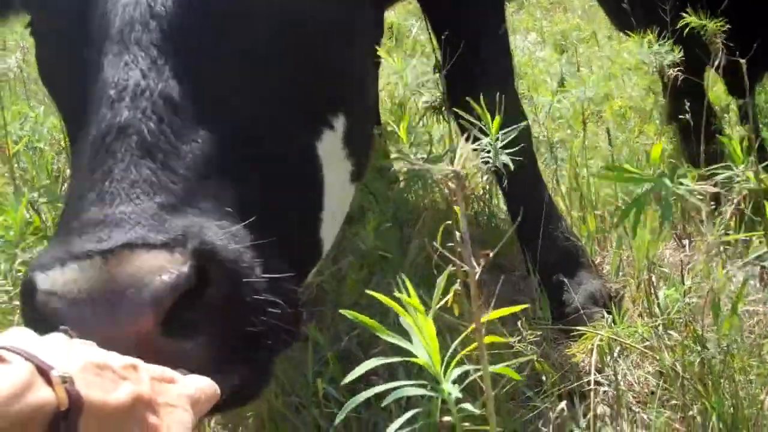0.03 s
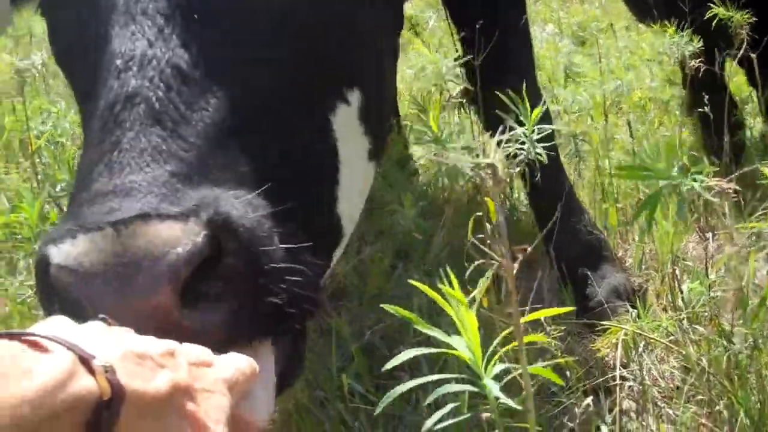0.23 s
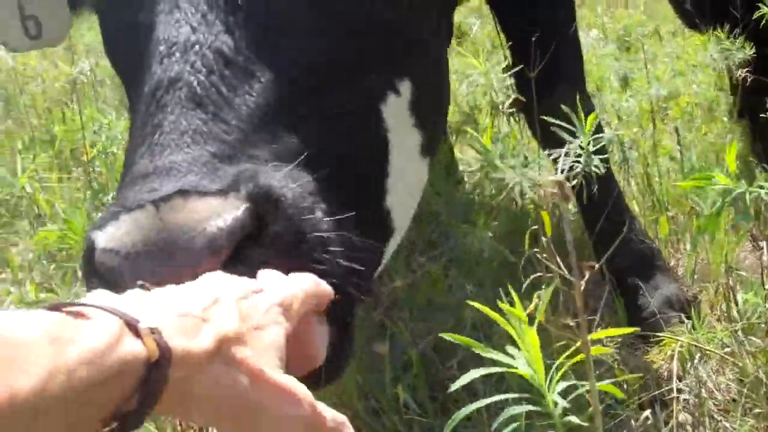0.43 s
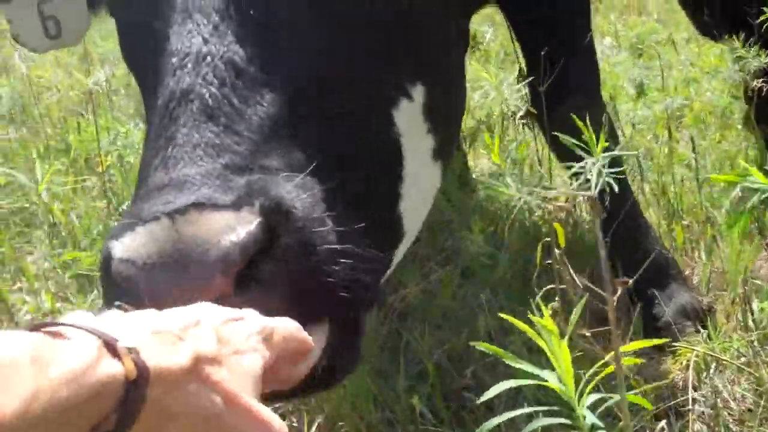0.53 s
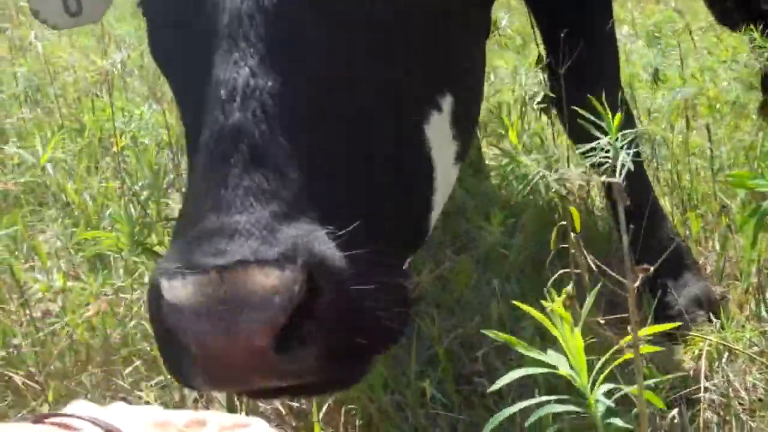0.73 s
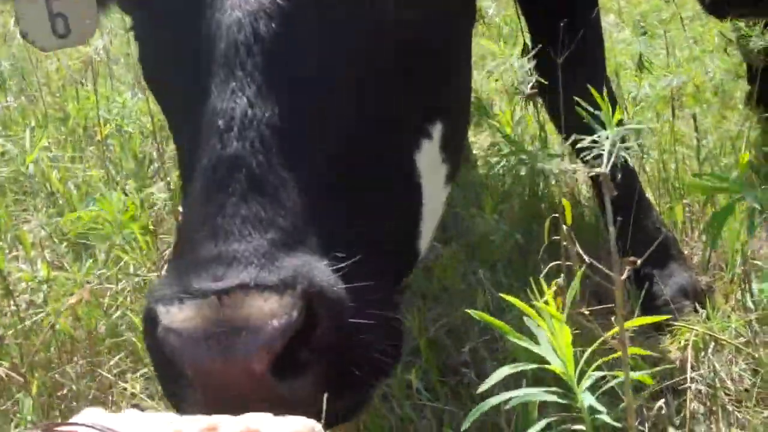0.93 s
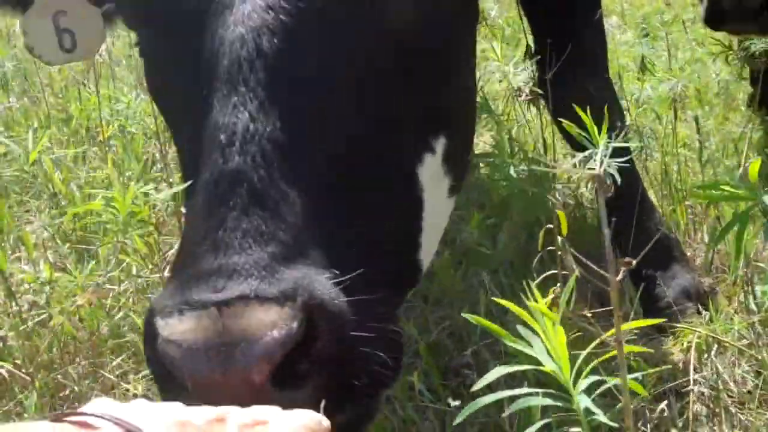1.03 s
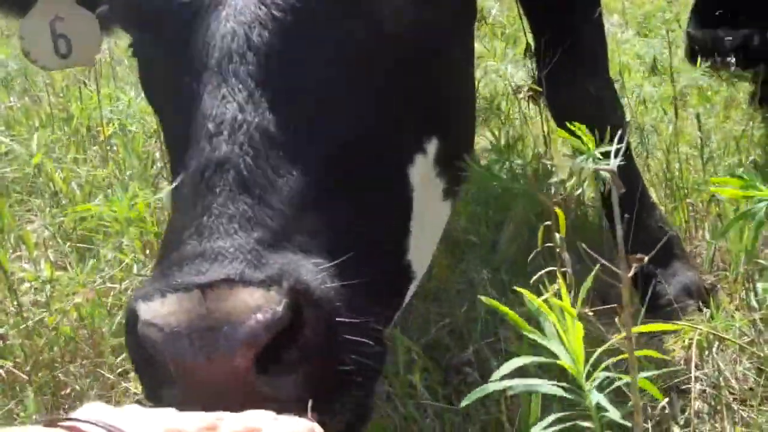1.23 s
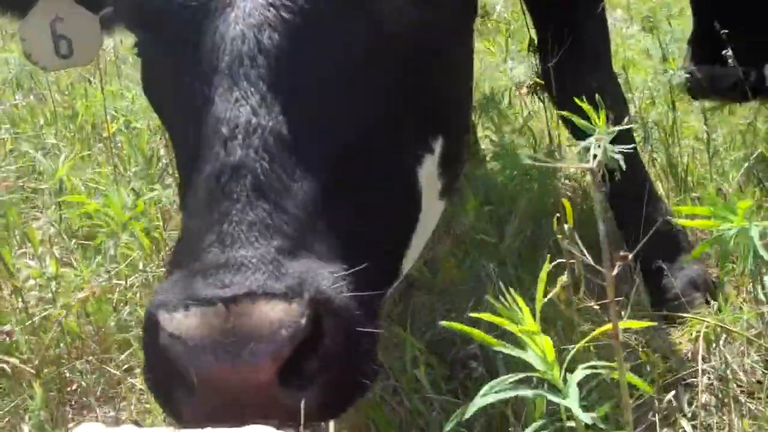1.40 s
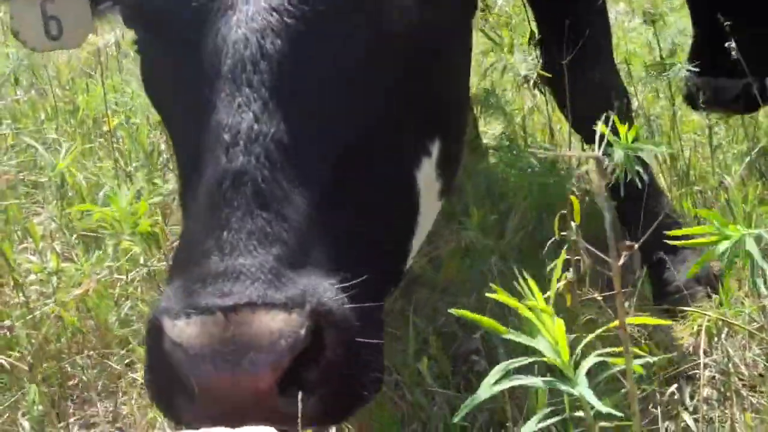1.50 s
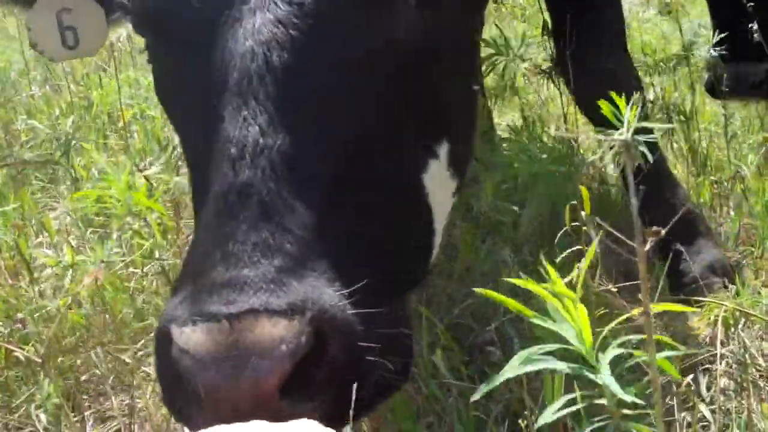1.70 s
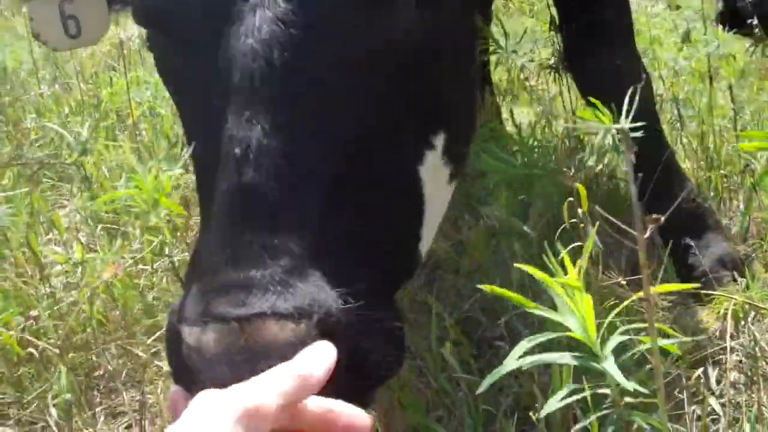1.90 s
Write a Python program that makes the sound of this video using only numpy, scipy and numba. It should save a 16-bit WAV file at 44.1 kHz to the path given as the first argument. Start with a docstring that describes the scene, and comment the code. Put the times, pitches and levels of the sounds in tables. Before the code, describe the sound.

A single cow moos very close in a quiet pasture, beginning as a muffled nasal hum, opening abruptly, rising in pitch and force, then dropping into a short rough ending; faint air hiss and a dry tick follow.

```python
"""A faint open-air hiss is heard first, with a nasal hum that opens abruptly into one close cow's moo.
The call climbs in pitch and force, then sags into a short rough ending; a faint small tick, puffs of air,
wind bumps and a dry tick surround it. The voice is a source-filter sum: harmonics and pulsed breath shaped
by tract resonances. Air, wind, puffs and the small tick are shaped noise; the dry tick sums decaying modes."""
import sys
import numpy as np
from scipy import signal
from scipy.fft import rfft, irfft
from scipy.io import wavfile
from scipy.ndimage import uniform_filter1d, map_coordinates
from numba import njit

SR = 44100
rng = np.random.default_rng(int(sys.argv[2]) if len(sys.argv) > 2 else 0)


def persist_wave(psi):
    """Save psi, clipped to +-1, as 16-bit WAV."""
    counts = np.round(np.clip(psi, -1, 1) * 32767).astype(np.int16)
    wavfile.write(sys.argv[1], SR, np.atleast_2d(counts).T)


N = 85995  # samples

# Relative spectrum of the open air [f/Hz, level/dB]
AIR_SPECTRUM = [(30, -4), (125, -2), (220, -3.5), (450, -7.5), (900, -10.5), (2000, -10.5), (4000, -11),
                (8000, -14), (10000, -15.5), (14000, -30)]
# Likeness of the air at the two ears [f/Hz, correlation]
AIR_CORRELATION = [(40, 1), (150, 1), (600, 0.84), (2500, 0.49), (8000, 0)]
AIR_DB, AIR_SWELL_DB = -45, .5
AIR_PAN_DB, COW_PAN_DB = -3.8, -1.9  # left minus right

# Wind bumps on the microphone [t/s, standard deviation/s, level/dB]
WIND_BUMPS = [(0.382, 0.01, -50), (0.998, .025, -41), (1.516, 0.05, -49), (1.682, 0.023, -37.5),
              (1.86, 0.077, -51.5)]
BUMP_HZ, BUMP_WIDTH_HZ, RUMBLE_DB = 60, 71, -57.5

# First one faint small tick, then puffs of air [t/s, standard deviation/s, hiss level/dB, low rush level/dB]
NOISE_BURSTS = [(0.117, .002, -41.5, -62), (0.349, 0.041, -41.5, -35), (0.596, 0.024, -39, -60),
                (0.905, 0.0067, -42.5, -38), (0.97, 0.029, -43, -43), (1.603, 0.0034, -39, -37),
                (1.661, 0.1, -51.5, -44)]
HISS_HZ, HISS_WIDTH_HZ = 6430, 9200
RUSH_HZ, RUSH_WIDTH_HZ = 377, 1530

# Modes of the dry tick, before its soft onset [f/Hz, decay/s, relative level/dB]
TICK_MODES = [(2280, .0008, -2), (2700, .0008, 0), (4000, .0012, -18), (5300, .0008, -17)]
TICK_S, TICK_ATTACK_S, TICK_PEAK_DB = 1.9284, .003, -21

FIELD_DB, FIELD_DECAY_S = -20, .02  # scatter from grass and ground

# Vibration rate of the vocal folds, before smoothing and jitter [t/s, f/Hz]
FOLD_PITCH = [(0, 105.1), (.102, 109.7), (.17, 114.8), (.238, 121.1), (.36, 125.8), (.48, 130.6),
              (.6, 134.6), (.78, 139.8), (.842, 144.1), (.96, 156.1), (1.054, 164), (1.2, 170.5),
              (1.315, 174.9), (1.38, 175.5), (1.445, 174.5), (1.498, 169.8), (1.526, 164.5), (1.552, 151),
              (1.58, 134), (1.62, 114)]
# Roughness of the folds [t/s, jitter as share of pitch, breath level/dB relative to the harmonics]
FOLD_ROUGHNESS = [(0, .005, -20), (.2, .003, -23), (.5, .0013, -28), (1.2, .001, -28), (1.5, .0012, -27),
                  (1.54, .005, -22), (1.58, .012, -16), (1.63, .02, -12)]
# Centres of the two main resonances [t/s, throat f/Hz, mouth f/Hz]
TRACT_SHAPE = [(0, 370, 1840), (.28, 380, 1947), (.45, 370, 1914), (.72, 379, 1909), (.95, 374, 1950),
               (1.13, 402, 1962), (1.3, 398, 1940), (1.44, 400, 1954), (1.52, 382, 1986), (1.57, 350, 1940),
               (1.61, 378, 1960)]
# Pitch at low, middle and full effort [f/Hz]
EFFORT_PITCH = [126.4, 134.1, 173.4]

# Levels of the harmonics in each part of the tract, before the dips:
# throat and nose sound from the start; mouth and treble join when the mouth opens.
# Low throat resonances [t/s, level/dB]
THROAT_COURSE = [(0.0, -44.5), (0.15, -37.5), (0.176, -31), (0.254, -27), (0.586, -19), (0.796, -20),
                 (0.96, -22), (1.456, -18), (1.542, -23), (1.592, -19), (1.635, -36.5)]
# Nasal ring [t/s, level/dB]
NOSE_COURSE = [(0, -50), (.15, -48), (.2, -45), (.27, -36), (.42, -34), (.52, -38), (.66, -55), (.9, -52),
               (1.25, -48), (1.5, -50), (1.62, -58)]
# Bright middle of the voice [t/s, level/dB]
MOUTH_COURSE = [(0.172, -35), (0.196, -33), (0.268, -28), (0.54, -24.5), (0.588, -27), (0.648, -23.5),
                (0.838, -24.5), (1.09, -15.5), (1.186, -16.5), (1.336, -14), (1.542, -16.5), (1.55, -21),
                (1.61, -28.5), (1.625, -51)]
# Treble of the voice [t/s, level/dB]
TREBLE_COURSE = [(.172, -45), (.25, -41), (.31, -35), (.44, -35), (.52, -33), (.64, -31.5), (.76, -34),
                 (.85, -39), (.96, -36), (1.06, -31), (1.15, -32), (1.25, -26.5), (1.32, -30),
                 (1.44, -32.5), (1.52, -31), (1.56, -38), (1.6, -42), (1.625, -51)]

# Side resonances, relative levels before flutter, centres before drift:
# throat [f/Hz, width/Hz, level/dB at low, middle and full effort]
THROAT_CAVITIES = [(154, 200, -21, -34, -29), (712, 170, -19.5, -52, -16)]
# mouth, also shifted with its main resonance [f/Hz, width/Hz, level/dB at low, middle and full effort]
MOUTH_CAVITIES = [(937, 128, -14, -13, -9.5), (1145, 130, -11, -19, -17), (1462, 107, -4, -8.5, -5.5),
                  (1733, 236, -80, -14, -9.5), (2284, 50, -10, -12, -20.5), (2340, 132, -24, -56.5, -11)]
# treble [f/Hz, width/Hz, level/dB at low, middle and full effort]
TREBLE_CAVITIES = [(2960, 110, -12, -9, 2), (3130, 130, 5, -5, -7), (3450, 200, -7, -3, 1),
                   (3700, 190, -6, 3, -9), (3870, 150, -8, 1, 1), (4320, 120, -15, -18, -11),
                   (4700, 300, -19, -18, -18), (5200, 160, -23, -18, -23), (6150, 220, -23, -25, -20),
                   (6900, 220, -25, -27, -20)]
# Fixed nasal resonances [f/Hz, width/Hz, relative level/dB]
NASAL_MODES = [(2650, 140, 0), (4380, 200, -16)]
# Dips from the side branch of the nose [f/Hz, width/Hz, depth share, capped at 0.95 in use]
NASAL_DIPS = [(1197, 96, 0.83), (2795, 37, 1), (545, 80, 0.53), (3819, 45, 1)]

HUM_HZ, HUM_WIDTH_HZ, HUM_DB = 1193, 156, -45.5  # sounds until the mouth opens
THROAT_WIDTH_HZ, MOUTH_WIDTH_HZ = 99.4, 105
THROAT_SKIRT, SKIRT = 1.87, 2.5  # width of the second, wider resonance, in first widths
FLUTTER_DB, DRIFT = 1.8, .006  # wander of level, and of centre as a share
OPENS_S, OPENING_S, ENDS_S, RELEASE_S = .165, .002, 1.632, .02
BREATH_CORNER_HZ = 2400  # breath gains on the harmonics above this
LAG_S_PER_HZ = 3.5e-7  # extra delay of the treble, per hertz
HOP, BINS, HARMONICS = 128, 2048, 60  # samples between tract frames, transform length, partials
TOP_HZ = 14200


def undb(db):
    """The decibel law: level to amplitude gain."""
    return 10 ** (np.asarray(db) / 20)


def curve(rows, axis=1):
    """Linear interpolation of one table column over time."""
    rows = np.array(rows, float)
    return np.interp(np.arange(N) / SR, rows[:, 0], rows[:, axis])


def unit(x):
    """Normalisation to unit root-mean-square."""
    return x / np.sqrt(np.mean(x ** 2))


def pan(db):
    """Stereo level difference: half the decibels to each side, in opposite senses."""
    return undb(np.array([[db], [-db]]) / 2)


def walk(rate):
    """Smoothed random steps, about `rate` per second, with a spread near 1."""
    step = int(SR / rate)
    steps = np.repeat(rng.standard_normal(N // step + 1), step)
    smooth = uniform_filter1d(uniform_filter1d(steps, step), step)
    return unit(smooth)[:N]


@njit
def svf(x, hz, width):
    """State-variable resonance: two integrators in feedback pass a band about a moving centre."""
    y, band, low = np.empty(len(x)), 0., 0.
    for i in range(len(x)):
        g = np.tan(np.pi * hz[i] / SR)
        damping = width / hz[i]
        v = (band + g * (x[i] - low)) / (1 + g * (g + damping))
        band = 2 * v - band
        low = low + 2 * g * v
        y[i] = damping * v
    return y


def ring(x, hz, width_hz, skirt_hz):
    """Cascaded resonance: a second resonance steepens the flanks of the first."""
    centre = hz * np.ones(N)
    return svf(svf(x, centre, float(width_hz)), centre, float(skirt_hz))


def noise(hz, width_hz):
    """Band-limited noise: resonance selects a band of white noise, set to rms 1."""
    return unit(ring(rng.standard_normal(N), hz, width_hz, width_hz))


def swell(at, spread):
    """Gaussian envelope about one moment."""
    return np.exp(-((np.arange(N) / SR - at) / spread) ** 2 / 2)


def along(log_hz, rows):
    """Interpolation of a spectrum on a logarithmic frequency axis."""
    rows = np.array(rows)
    return np.interp(log_hz, np.log(rows[:, 0]), rows[:, 1])


def air():
    """Partial coherence: shared and opposed noise make a gently swelling hiss, less alike in the treble."""
    log_hz = np.log(np.fft.rfftfreq(N, 1 / SR) + 1)
    alike = np.clip(along(log_hz, AIR_CORRELATION), -1, 1)
    colour = undb(along(log_hz, AIR_SPECTRUM))
    mid = irfft(rfft(rng.standard_normal(N)) * colour * np.sqrt(1 + alike), N)
    side = irfft(rfft(rng.standard_normal(N)) * colour * np.sqrt(1 - alike), N)
    level = undb(AIR_DB + AIR_SWELL_DB * walk(1.5))
    return unit(np.array([mid + side, mid - side])) * level * pan(AIR_PAN_DB)


def wind():
    """Incoherent low-frequency noise: a rumble with soft bumps, independent in each channel."""
    rumble = np.array([noise(BUMP_HZ, BUMP_WIDTH_HZ) for _ in range(2)])
    bumps = sum(undb(db) * swell(at, spread) for at, spread, db in WIND_BUMPS)
    return rumble * (undb(RUMBLE_DB) + bumps)


def small_tick_and_puffs():
    """Gaussian-gated noise: a faint small tick, then puffs of air, as independent hiss over a common rush."""
    hiss = np.array([noise(HISS_HZ, HISS_WIDTH_HZ) for _ in range(2)]) * pan(AIR_PAN_DB)
    rush = noise(RUSH_HZ, RUSH_WIDTH_HZ)
    total = 0
    for at, spread, hiss_db, rush_db in NOISE_BURSTS:
        total = total + swell(at, spread) * (undb(hiss_db) * hiss + undb(rush_db) * rush)
    return total


def dry_tick():
    """Modal decay: damped sinusoids with a soft onset make a dry tick, like a stalk snapping."""
    age = np.maximum(np.arange(N) / SR - TICK_S, 0)
    modes = sum(undb(db) * np.exp(-age / decay) * np.sin(2 * np.pi * hz * age)
                for hz, decay, db in TICK_MODES)
    modes = modes * (1 - np.exp(-age / TICK_ATTACK_S)) ** 2
    return undb(TICK_PEAK_DB) * modes / np.abs(modes).max()


def field(x):
    """Diffuse scattering: a brief, treble-rich tail in opposite phase left and right widens the sound."""
    age = np.arange(SR // 8) / SR
    tail = rng.standard_normal(len(age)) * np.exp(-age / FIELD_DECAY_S)
    bright = svf(x, np.full(N, 4200.), 3330.0)
    scattered = signal.fftconvolve(x * 1.4 + 3.25 * bright, tail / np.linalg.norm(tail))[:N]
    side = undb(FIELD_DB) * scattered
    return np.array([side, -side])


def peak(grid, hz, width_hz, skirt=SKIRT):
    """Resonance law: power response with steepened flanks, moments x frequencies."""
    hz = np.reshape(hz, (-1, 1))
    off = ((grid ** 2 - hz ** 2) / (grid * width_hz)) ** 2
    return 1 / ((1 + off) * (1 + off / skirt ** 2))


def cavities(grid, rows, pitch, shift):
    """Superposed resonances: strengths follow vocal effort, read from pitch; levels and centres wander."""
    total = 0
    for hz, width, *db in rows:
        level = np.interp(pitch, EFFORT_PITCH, db) + FLUTTER_DB * walk(12.09)[::HOP]
        centre = hz * (1 + shift + DRIFT * walk(9)[::HOP])
        total = total + undb(level)[:, None] ** 2 * peak(grid, centre, width)
    return total


def at_harmonics(response, pitch):
    """Harmonic sampling: a moving response read at the first multiples of the pitch."""
    bins = np.outer(pitch, np.arange(1, HARMONICS + 1)) * BINS / SR
    moments = np.arange(len(pitch))[:, None] + 0 * bins
    return map_coordinates(response, [moments, bins], order=1)


def frame_level(rows):
    """Gain at each tract frame, by the decibel law."""
    return undb(curve(rows)[::HOP])


def tract(pitch):
    """Vocal-tract filtering: throat, nose and mouth powers add; the nose's side branch cuts dips."""
    grid = np.fft.rfftfreq(BINS, 1 / SR) + 1
    opened = np.clip((np.arange(N)[::HOP] / SR - OPENS_S) / OPENING_S, 0, 1)
    throat_hz = curve(TRACT_SHAPE)[::HOP]
    mouth_hz = curve(TRACT_SHAPE, axis=2)[::HOP]
    mouth_shift = mouth_hz / np.median(mouth_hz) - 1

    throat = peak(grid, throat_hz, THROAT_WIDTH_HZ, THROAT_SKIRT)
    throat = throat + cavities(grid, THROAT_CAVITIES, pitch, 0)
    mouth = peak(grid, mouth_hz, MOUTH_WIDTH_HZ) + cavities(grid, MOUTH_CAVITIES, pitch, mouth_shift)
    treble = cavities(grid, TREBLE_CAVITIES, pitch, 0)
    nose = sum(undb(db) ** 2 * peak(grid, hz + 0 * pitch, width) for hz, width, db in NASAL_MODES)
    hum = peak(grid, HUM_HZ + 0 * pitch, HUM_WIDTH_HZ)

    parts = [(throat, frame_level(THROAT_COURSE)),
             (mouth, opened * frame_level(MOUTH_COURSE)),
             (treble, opened * frame_level(TREBLE_COURSE)),
             (nose, frame_level(NOSE_COURSE)),
             (hum, (1 - opened) * undb(HUM_DB))]
    total = 0
    for power, rms in parts:
        # the harmonics of each part together carry its rms
        scale = 2 * rms ** 2 / at_harmonics(power, pitch).sum(axis=1)
        total = total + power * scale[:, None]
    gain = np.sqrt(total)
    for hz, width, depth in NASAL_DIPS:
        gain = gain * (1 - np.clip(depth, 0, .95) * peak(grid, hz, width))
    return gain + 1e-6, grid


def fold_harmonics(gain, grid, pitch, phase):
    """Fourier synthesis with minimum phase: fold pulses are harmonics, each resonance ringing after its pulse."""
    n = np.arange(N)
    cepstrum = irfft(np.log(gain))[:, :BINS // 2]
    lag = 2 * rfft(cepstrum, BINS).imag
    lag = lag - np.pi * LAG_S_PER_HZ * grid ** 2  # the treble leaves the tract a little later
    sizes = at_harmonics(gain, pitch).T
    turns = at_harmonics(lag, pitch).T
    voice = 0
    for number, (size, turn) in enumerate(zip(sizes, turns), start=1):
        angle = number * phase + np.interp(n, n[::HOP], turn)
        voice = voice + np.interp(n, n[::HOP], size) * np.cos(angle)
    return voice


def fold_breath(gain, grid, hz, phase):
    """Amplitude-modulated turbulence: noise pulses once a fold cycle and passes through the tract."""
    pulsed = unit(rng.standard_normal(N) * (1.5 + np.cos(phase - 1)))
    # at 0 dB, a band one pitch wide has the power of a unit harmonic
    pulsed = pulsed * undb(curve(FOLD_ROUGHNESS, axis=2)) * np.sqrt(SR / hz) / 2
    window = dict(nperseg=4 * HOP, noverlap=3 * HOP, nfft=BINS)
    frames = signal.stft(pulsed, **window)[2]
    frames[:, :len(gain)] *= (gain * (1 + (grid / BREATH_CORNER_HZ) ** 2)).T
    return signal.istft(frames, **window)[1][:N]


def cow():
    """Source-filter principle: jittered fold vibration and breath excite one moving vocal tract."""
    hz = uniform_filter1d(curve(FOLD_PITCH), size=900, mode="nearest")
    pitch = hz[::HOP]
    gain, grid = tract(pitch)
    jitter = curve(FOLD_ROUGHNESS) * walk(150)
    phase = 2 * np.pi * np.cumsum(hz * (1 + jitter)) / SR
    call = fold_harmonics(gain, grid, pitch, phase) + fold_breath(gain, grid, hz, phase)
    return call * np.clip((ENDS_S - np.arange(N) / SR) / RELEASE_S, 0, 1)


def scene():
    """Superposition: cow and dry tick just right of centre, with the pasture around them."""
    near = cow() + dry_tick()
    return air() + wind() + small_tick_and_puffs() + field(near) + near * pan(COW_PAN_DB)


def record(dry):
    """Low-pass filtering: the recorder dulls the top octave and cuts above it."""
    soft = signal.sosfilt(signal.butter(4, 11000, fs=SR, output="sos"), dry)
    return signal.sosfilt(signal.ellip(8, .2, 70, TOP_HZ, fs=SR, output="sos"), soft)


dry = scene()
out = record(dry)
persist_wave(out)
```